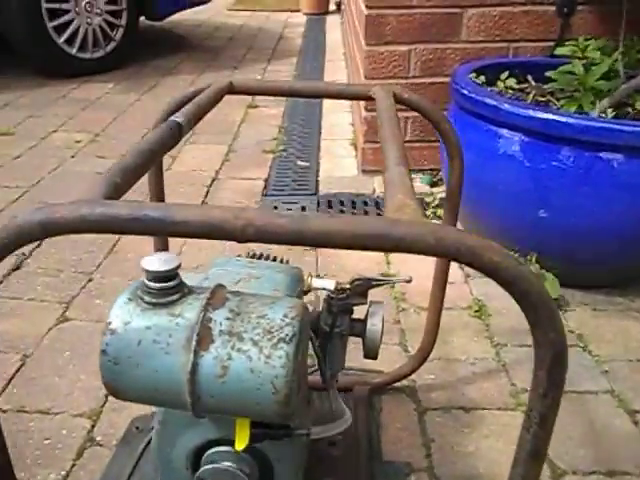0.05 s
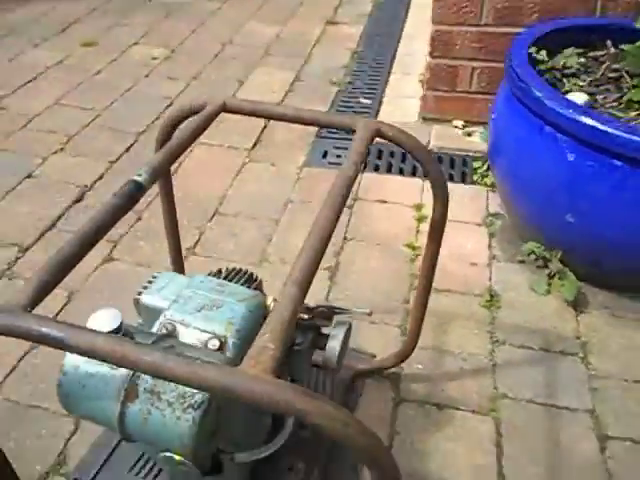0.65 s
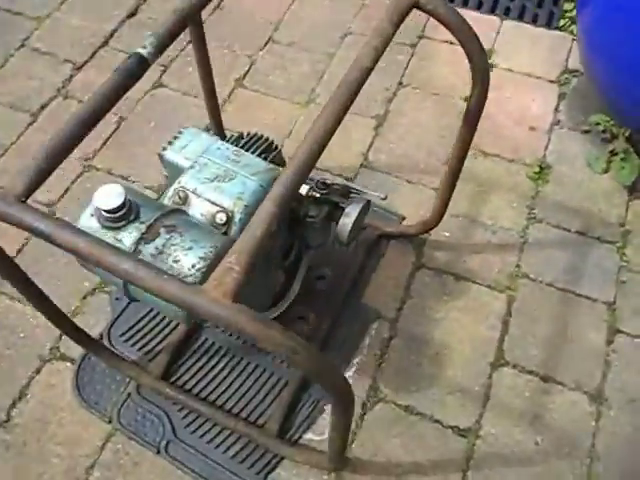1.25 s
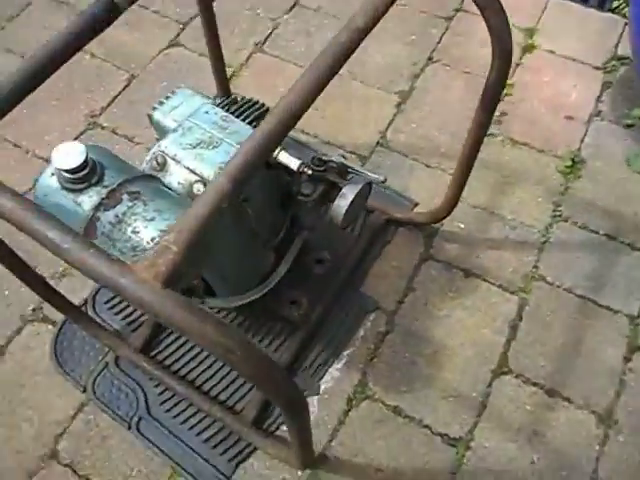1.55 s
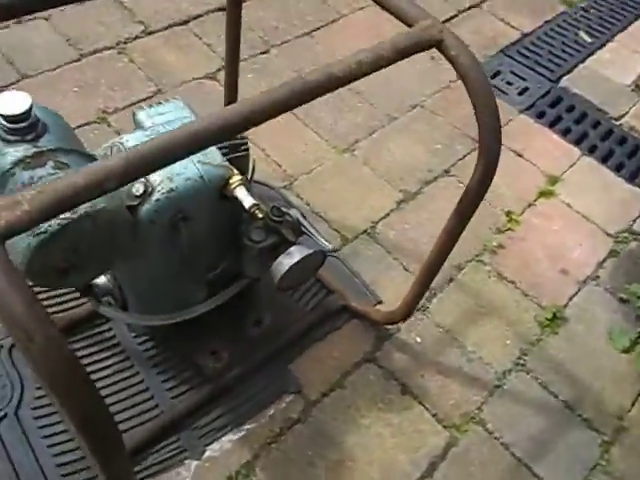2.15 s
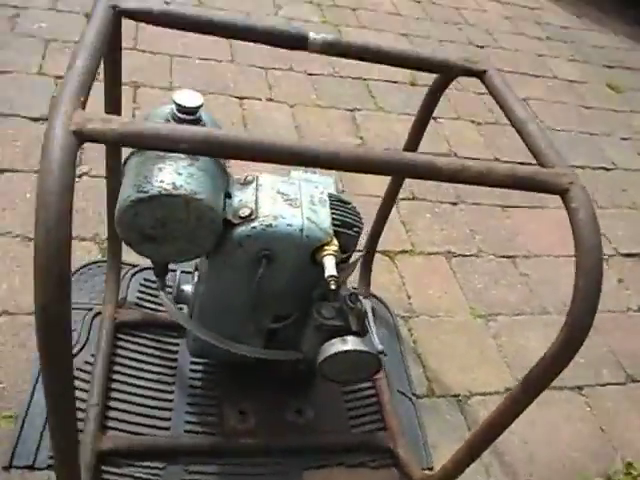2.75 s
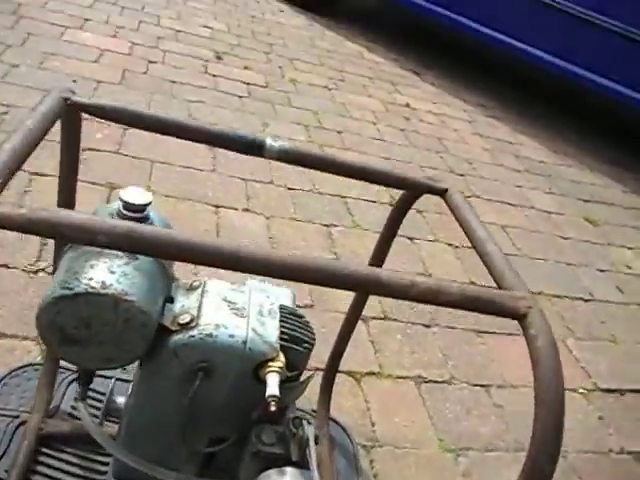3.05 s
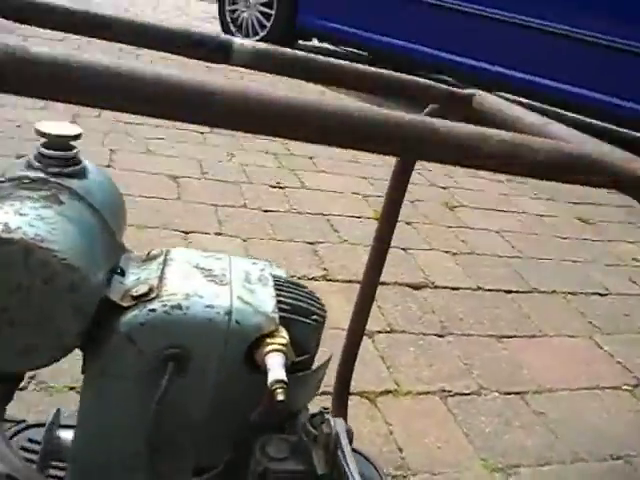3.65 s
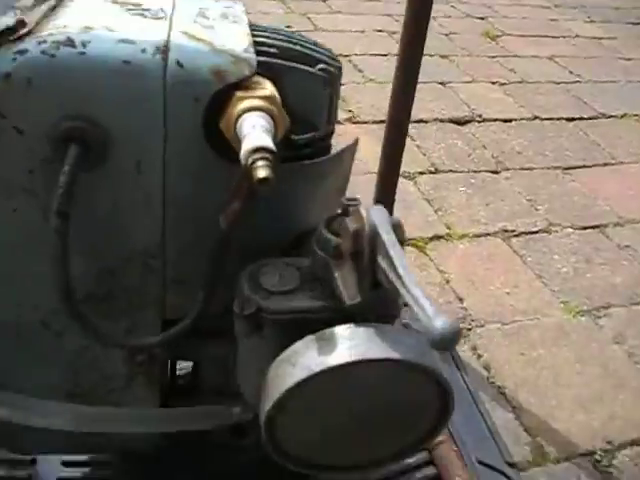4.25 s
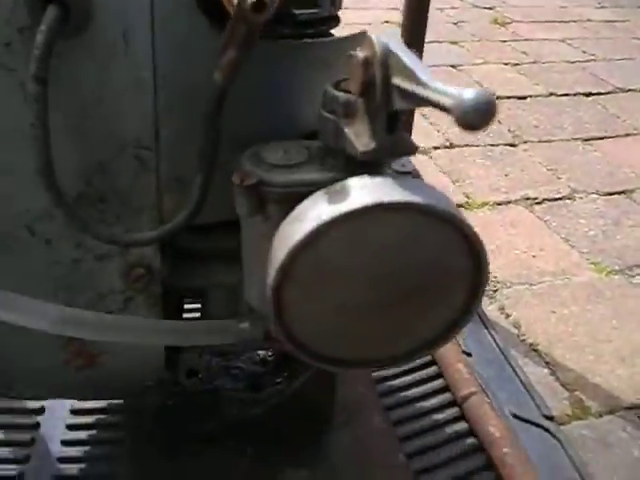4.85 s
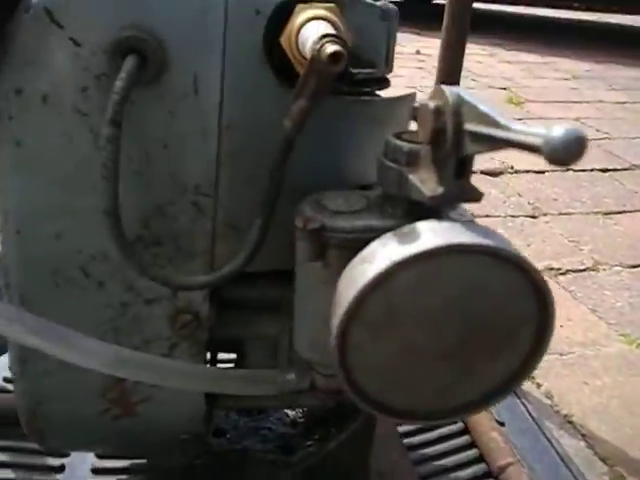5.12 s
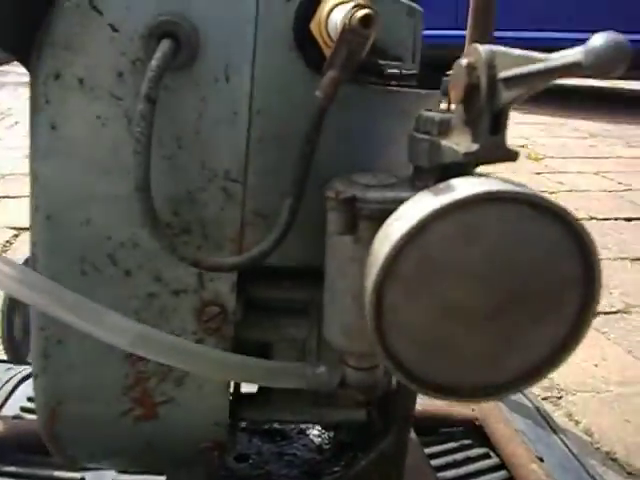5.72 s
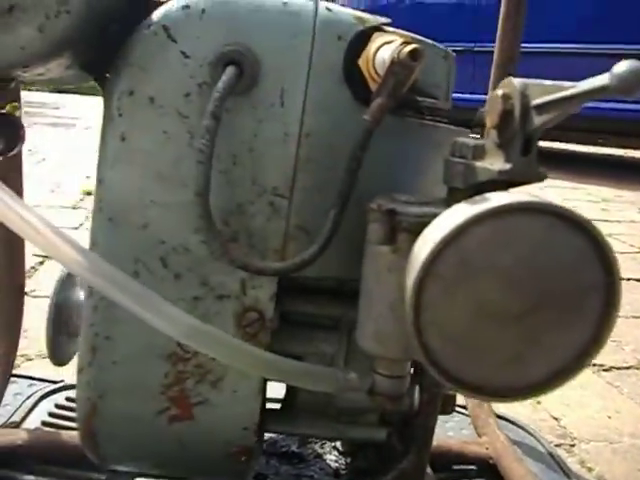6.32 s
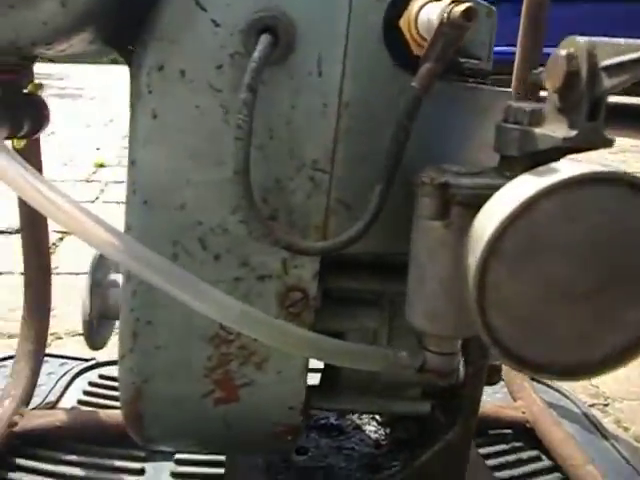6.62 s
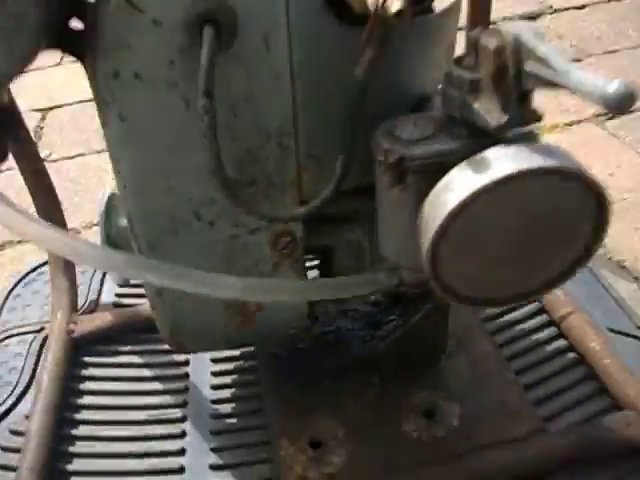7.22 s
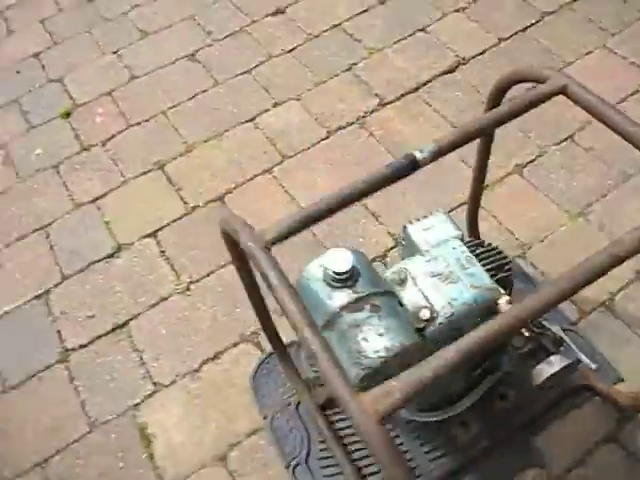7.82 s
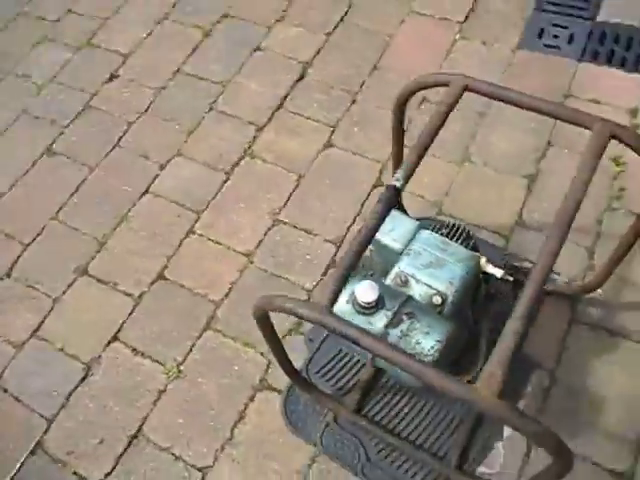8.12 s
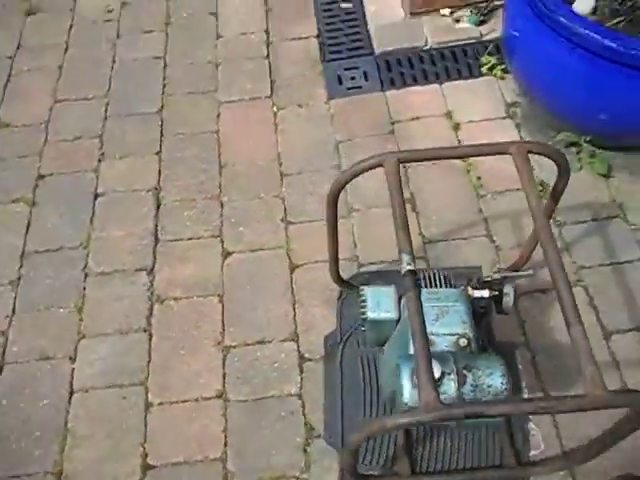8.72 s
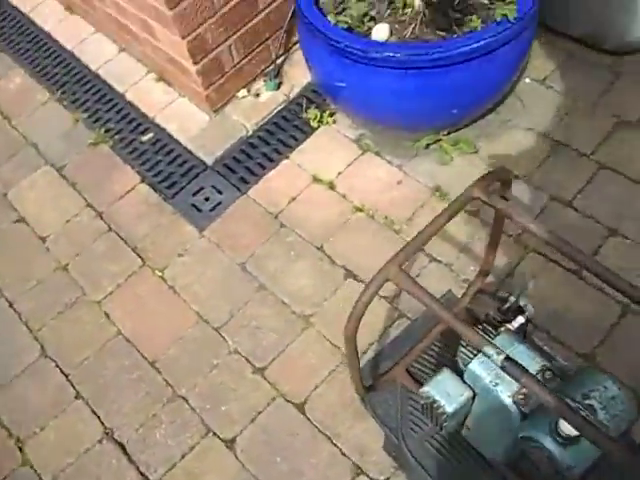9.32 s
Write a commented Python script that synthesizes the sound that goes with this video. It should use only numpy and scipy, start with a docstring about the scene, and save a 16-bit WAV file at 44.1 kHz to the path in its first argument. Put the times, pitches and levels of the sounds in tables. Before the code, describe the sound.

A small two-stroke engine idles outdoors with sharp, uneven exhaust pops, while electrical ticks break into the microphone.

```python
"""Idling two-stroke engine

A small engine idles on a paved driveway while the microphone is carried round it. It turns about
24 times a second and fires every third turn, at times early: a sharp exhaust crack, soft puffs between.
The carburettor hisses once a turn over the rumble of the running gear. The ignition lead puts ticks
into the microphone's amplifier, which duck the gain. Wind buffets the microphone."""
import sys
import numpy as np
from scipy import signal
from scipy.fft import rfft, irfft, next_fast_len
from scipy.io import wavfile

SR = 44100
rng = np.random.default_rng(int(sys.argv[2]) if len(sys.argv) > 2 else 0)


def file_out(sig):
    """Save sig as 16-bit WAV at sys.argv[1]."""
    # one column per channel
    cols = np.atleast_2d(sig).T
    # limit, then scale
    lim = np.clip(cols, -1, 1)
    pcm = np.round(lim * 32767).astype(np.int16)
    wavfile.write(sys.argv[1], SR, pcm)


N = 417627
TIME_S = np.arange(N) / SR

# Hunting idle. Each row: time in seconds, speed in turns per second.
CRANK_SPEED = [(0.0, 22.64), (0.25, 24.72), (0.41, 22.3), (1.66, 24.37), (1.79, 23.25), (3.11, 24.03),
               (3.94, 23.46), (4.06, 24.56), (4.3, 22.01), (4.78, 24.98), (4.93, 22.66), (5.07, 24.74),
               (5.79, 22.57), (5.98, 24.89), (6.64, 23.57), (6.99, 24.14), (7.33, 21.64), (7.65, 23.32),
               (8.03, 23.11), (8.15, 24.58), (8.66, 24.08), (8.78, 24.84), (9.47, 24.37)]
# Early firings that restart the count of three. Each entry: time in seconds.
EARLY_FIRINGS_S = [.09, 1.47, 1.67, 3.27, 3.61, 4.2, 4.29, 4.88, 7.1, 7.19, 9.42]
# Exhaust along the walk. Each row: time in seconds, crack gain in dB, bark and sizzle offsets in dB.
EXHAUST_GAINS = [(0, -13, -2, -8), (.55, -32, 1, 1), (1.4, -21.5, -7, -14.5), (2, -27.5, -2.5, -7.5),
                 (2.7, -17, -2.5, -7), (3.4, -23.5, -6.5, -14), (3.8, -18, -8, -12), (4.7, -17, -1.5, -1.5),
                 (5.6, -21, -1, 1), (6.4, -20, 0.5, -1), (7, -27.5, -1, 3), (7.45, -16, -3, -10),
                 (8.3, -23, 0, -8), (9.47, -19, 0, 1.5)]
# Hard or feeble firings. Each row: time in seconds, crack level in dB re its neighbours.
FIRING_ACCENTS = [(1, 7), (1.59, 6), (1.67, -31), (2.56, 3), (3.19, -2.5), (3.53, -7.5), (3.74, 3.5),
                  (4.55, 4), (4.8, -5), (4.88, 4), (5.51, 2.5), (5.64, -2), (6.39, -0.5), (7.6, -1),
                  (7.72, -6), (8.11, 4.5), (8.48, 3), (8.85, 3.5), (8.97, 4), (9.33, -11.5)]
# Gas path resonances. Each row: frequency in Hz, width in Hz, gain in dB.
SILENCER_MODES = [(246, 220, -5.5), (460, 61, 6.5), (730, 94, 15.5)]
# Silencer shell and cylinder head. Each row: frequency in Hz, width in Hz, gain in dB.
METAL_MODES = [(1887, 47, -0.5), (4490, 59, 0), (4730, 160, 0.5), (5670, 94, 2.5), (6990, 58, 4),
               (9164, 59, 7)]
# Engine along the walk. Each row: time in seconds, then intake, rumble and puff gains in dB.
WALK_GAINS = [(0, -33, -26, -19), (.6, -40.5, -38.5, -24), (1.2, -37.5, -29.5, -18), (2, -39.5, -32.5, -22),
              (2.6, -29, -26, -13), (3.3, -38.5, -39.5, -26), (3.8, -28.5, -31, -13),
              (5.5, -28.5, -31.5, -13.5), (7.1, -32, -31, -13), (7.7, -35, -30.5, -19),
              (8.9, -31, -27.5, -23), (9.47, -36, -29, -22)]
# Intake hiss. Each row: frequency in Hz, relative density in dB.
INTAKE_SPECTRUM = [(1220, -16), (1500, 1.5), (1720, -4), (2000, -1), (2650, 5.5), (3100, -0.5), (5000, 2.5),
                   (5500, 11), (5900, -1), (6600, 0.5), (8000, -13.5), (11000, -14.5)]
# Ignition pick-up. Each row: start in seconds, spark count, first strength re full scale before overload.
SPARK_BURSTS = [(0.024, 2, 1.63), (0.111, 3, 1.63), (0.2356, 7, 1.26), (0.6277, 1, 0.83), (0.719, 4, 0.63),
                (0.9315, 1, 0.68), (1.0188, 4, 0.73), (1.3996, 1, 1.14), (1.6073, 4, 1.22),
                (1.8165, 2, 0.62), (1.947, 1, 0.67), (2.0732, 2, 1.22), (2.2032, 1, 0.88),
                (2.3709, 4, 0.63), (2.7499, 1, 0.61), (2.8365, 1, 1.25), (2.9203, 2, 1.2),
                (3.0853, 6, 1.27), (3.7157, 3, 0.37), (4.0524, 3, 0.55), (4.2223, 1, 2.26),
                (4.311, 1, 0.75), (4.6149, 2, 0.33), (4.7781, 1, 1.12), (4.9038, 1, 1.24),
                (5.1542, 5, 0.85), (5.5299, 2, 1.46), (5.879, 1, 0.27), (5.9198, 2, 1.6), (6.0012, 1, 0.91),
                (6.5364, 1, 1.22), (6.621, 7, 1.1), (7.3933, 1, 0.33), (7.7865, 1, 0.75), (8.9877, 1, 0.59)]
# Crankcase, flywheel fan and frame. Each row: frequency in Hz, relative density in dB.
RUMBLE_SPECTRUM = [(50, 4), (150, 0.5), (310, -4), (435, -8), (530, -12.5), (1200, -24.5), (3000, -32),
                   (11000, -41.5)]
# Cooling fin. Each row: frequency in Hz, width in Hz, gain in dB.
FIN_MODES = [(4450, 16, 8)]
# Flywheel cowl drone. Each row: time in seconds, gain in dB.
COWL_GAINS = [(0, -40), (6.9, -49), (8.2, -40.5), (9.47, -35.5)]
# Wind on the microphone. Each row: time in seconds, gain in dB.
WIND_GAINS = [(0, -37), (7.2, -36.5), (7.7, -24.5), (8.3, -30.5), (9.47, -27)]


def exhaust_cracks(times_s, level_db, bark_db, sizzle_db, rise_s=0.0009, fall_s=0.0023, tail_s=0.015):
    """Burnt gas bursts through the port: a brief jet of noise that rings the metal."""

    def blowdown(t_s):
        age_s = np.maximum(t_s + 0.0007, 0)
        attack = 1 - np.exp(-(age_s / rise_s) ** 2)
        scatter = from_db(-18) * np.exp(-age_s / tail_s)  # off paving, wall and frame
        return attack * (np.exp(-age_s / fall_s) + scatter)

    # The low bark leaves before the jet reaches full speed.
    bark = repeat(times_s - 0.0012, from_db(level_db + bark_db + 10), blowdown) * band_noise(440, 4120)
    crack = repeat(times_s, from_db(level_db + 11.5), blowdown) * band_noise(4100, 7430)
    sizzle = repeat(times_s, from_db(level_db + sizzle_db + 10), blowdown) * band_noise(8860, 10440)
    jet = bark + crack + sizzle
    return jet + metal_ring(jet, times_s)


def metal_ring(jet, times_s, detune=0.012, spread_db=3.0):
    """Gas of changing temperature drives the metal differently at each firing."""
    out, size = np.zeros(N), SR // 12
    for at_s, draws in zip(times_s, rng.standard_normal((len(times_s), len(METAL_MODES), 2))):
        modes = [(hz * (1 + detune * pitch_draw), width_hz, db + spread_db * gain_draw)
                 for (hz, width_hz, db), (pitch_draw, gain_draw) in zip(METAL_MODES, draws)]
        start = round(at_s * SR) - SR // 500
        out[start:start + size] += resonate(jet[start:start + size], modes)
    return out


def exhaust_thumps(times_s, crack_db, follow=0.57, width_s=0.00056):
    """Pressure wave under each crack: down, then up, growing with the crack."""
    return repeat(times_s, from_db(follow * crack_db),
                  lambda t_s: 0.96 * bump(t_s - 0.0019, width_s) - bump(t_s + 0.00046, width_s))


def crank_motion(start_turns=0.918):
    """Crank position in turns per sample, and exhaust port opening times, one a turn."""
    turns = start_turns + np.cumsum(curves(CRANK_SPEED)[0]) / SR
    return turns, np.interp(np.arange(1, int(turns[-1]) + 1), turns, TIME_S)


def firing_mask(openings_s, turns_per_firing=3):
    """Turns that fire, counted from the latest early firing."""
    fired = np.zeros(len(openings_s), bool)
    for at_s in EARLY_FIRINGS_S:
        first = nearest(openings_s, at_s)
        fired[first:] = np.arange(len(openings_s) - first) % turns_per_firing == 0
    return fired


def firing_levels_db(times_s, spread_db=0.9, steadying=0.56):
    """Crack gain, bark and sizzle offsets: microphone position plus charge strength."""
    crack_db, bark_db, sizzle_db = [np.interp(times_s, TIME_S, c) for c in curves(EXHAUST_GAINS)]
    swing_db = spread_db * rng.standard_normal(len(times_s))
    for at_s, accent_db in FIRING_ACCENTS:
        swing_db[nearest(times_s, at_s)] = accent_db
    # Bark and sizzle follow only part of the swing.
    return crack_db + swing_db, bark_db - steadying * swing_db, sizzle_db - steadying * swing_db


def port_puffs(times_s, level_db, width_s=0.00059, muffle_hz=1050, lead_s=0.00068):
    """An unfired turn gulps air at the port: a muffled pressure dip."""
    puff_db = np.interp(times_s, TIME_S, level_db) + rng.standard_normal(len(times_s))
    dips = repeat(times_s - lead_s, -from_db(puff_db), lambda t_s: np.exp(-abs(t_s) / width_s))
    return butterworth(dips, 6, muffle_hz)


def silencer_putter(openings_s, level_db, lag_s=0.0024, width_s=0.0052):
    """Gas rushes through the silencer at each port opening, with a hollow note."""
    gains = from_db(np.interp(openings_s, TIME_S, level_db) - 21)
    return repeat(openings_s + lag_s, gains, lambda t_s: bump(t_s, width_s)) * band_noise(660, 830)


def crankcase_note(turns, level_db, start_hz=230, rise_hz=520, peak_turns=0.32, width_turns=0.074):
    """The descending piston shrinks the crankcase; its note sweeps up once a turn."""
    position = turns % 1
    phase_rad = 2 * np.pi * np.cumsum(start_hz + rise_hz * position) / SR
    return from_db(level_db + 3) * bump(position - peak_turns, width_turns) * np.sin(phase_rad)


def intake_hiss(turns, level_db, peak_turns=0.61, width_turns=0.13, leak_db=-20, spread_db=2.5):
    """Air rasps through the carburettor near top of stroke; a little leaks all turn."""
    gate = bump(turns % 1 - peak_turns, width_turns) + from_db(leak_db)
    breath_db = spread_db * rng.standard_normal(int(turns[-1]) + 1)[turns.astype(int)]
    rasp_db = 3 * band_noise(66, 680)
    return from_db(level_db + 1.5 + breath_db + rasp_db) * gate * coloured_noise(INTAKE_SPECTRUM)


def sparks(openings_s, follow=0.8, ceiling=0.71, spread_db=1.1, near_s=0.015):
    """Time and strength of sparks, one a turn. Bursts open hard and go on weaker; the rest are faint."""
    due_s = (openings_s[1:] + openings_s[:-1]) / 2
    scatter = from_db(spread_db * rng.standard_normal(len(due_s)))
    faint = 0.26 * rng.random(len(due_s)) ** 2
    strong = []
    for start_s, count, strength in SPARK_BURSTS:
        first = nearest(due_s, start_s)
        strong.append((start_s, strength))
        for k in range(first + 1, first + round(count)):
            strong.append((start_s + due_s[k] - due_s[first], min(follow * strength, ceiling) * scatter[k]))
    gap_s = abs(due_s[:, None] - np.array(strong)[:, 0]).min(axis=1)  # to the nearest strong spark
    weak = np.c_[due_s, faint + 0.38 * np.exp(-gap_s / near_s)]
    return [*strong, *weak[gap_s > np.diff(due_s).mean() / 2]]


def ignition_ticks(pickup, overload=0.75, recover_s=0.019, coupling_hz=3.3):
    """Each spark is a leaking step; past overload the amplifier sticks at its rail, then snaps back."""
    out, age_s = np.zeros(N), TIME_S[:SR // 10]
    for at_s, strength in pickup:
        hold_s = 0.01 * max(strength - overload, 0)
        leak = min(strength, overload) * np.exp((hold_s - age_s) / recover_s)
        step = np.where(age_s < hold_s, 1.0, leak)
        start = round(at_s * SR)
        out[start:start + len(step)] += step[:N - start]
    return butterworth(out, 1, coupling_hz, "high")


def gain_control(ticks, threshold=0.067, db_per_unit=170, release_s=0.24):
    """Big ticks duck the gain a few dB; it creeps back between them."""
    pole = np.exp(-1 / (release_s * SR))
    excess = signal.lfilter([1 - pole], [1, -pole], np.maximum(ticks - threshold, 0) + 1e-18)
    return from_db(-db_per_unit * excess)


def gear_rumble(turns, level_db, throb_depth=0.69):
    """The running gear rumbles, throbbing once a turn."""
    throb = 1 + throb_depth * np.cos(2 * np.pi * turns)
    return from_db(level_db + 4) * coloured_noise(RUMBLE_SPECTRUM) * throb


def piston_slap(times_s, level_db):
    """The piston knocks at bottom of stroke and pings a cooling fin."""
    knocks = np.zeros(N)
    knocks[(times_s * SR).astype(int)] = rng.random(len(times_s))
    return resonate(knocks * from_db(level_db + 18), FIN_MODES)


def cowl_drone():
    """Air from the flywheel fan hums in its cowl."""
    return from_db(curves(COWL_GAINS)[0]) * band_noise(385, 465)


def wind(pop_s=8.2122, pop_half_width_s=0.00135):
    """Air buffets the microphone and pops it once."""
    pulse = from_db(-3) * (abs(TIME_S - pop_s) < pop_half_width_s)
    pop = butterworth(pulse, 2, [10, 2700], "band")
    return from_db(curves(WIND_GAINS)[0]) * band_noise(6.5, 120) + pop


def from_db(db):
    """Decibels to gain."""
    return 10 ** (np.asarray(db) / 20)


def curves(rows):
    """Table columns interpolated per sample."""
    times_s, *columns = np.transpose(rows)
    return [np.interp(TIME_S, times_s, column) for column in columns]


def nearest(times_s, at_s):
    """Index of the closest time."""
    return np.argmin(abs(times_s - at_s))


def bump(offset, width):
    """Gaussian of height 1."""
    return np.exp(-0.5 * (offset / width) ** 2)


def repeat(times_s, gains, shape):
    """One scaled copy of shape(seconds from event) at each time."""
    clicks, half = np.zeros(N), SR // 10
    inside = (times_s >= 0) & (times_s < TIME_S[-1])
    clicks[(times_s[inside] * SR).astype(int)] = gains[inside]
    return signal.fftconvolve(clicks, shape(np.arange(-half, half + 1) / SR), "same")


def butterworth(x, order, edges_hz, kind="low"):
    """Causal filter with a flat passband."""
    return signal.sosfilt(signal.butter(order, edges_hz, kind, fs=SR, output="sos"), x)


def band_noise(low_hz, high_hz):
    """Noise in one band, rms 1."""
    x = butterworth(rng.standard_normal(N), 2, [low_hz, high_hz], "band")
    return x / x.std()


def coloured_noise(spectrum):
    """Noise of a given spectrum, rms 1."""
    hz, db = np.transpose(spectrum)
    size = next_fast_len(N)
    bins_hz = np.maximum(np.fft.rfftfreq(size, 1 / SR), 1)
    gains = from_db(np.interp(np.log(bins_hz), np.log(hz), db))
    x = irfft(rfft(rng.standard_normal(size)) * gains, size)[:N]
    return x / x.std()


def resonate(x, modes):
    """Parallel two-pole resonators, each peaking at its gain in dB."""
    out = 0
    for hz, width_hz, db in modes:
        radius = np.exp(-np.pi * width_hz / SR)
        scale = (1 - radius ** 2) / 2
        feedback = [1, -2 * radius * np.cos(2 * np.pi * hz / SR), radius ** 2]
        out = out + from_db(db) * signal.lfilter([scale, 0, -scale], feedback, x + 1e-18)
    return out


def scene():
    """Exhaust, intake, running gear and ignition follow the crank; ticks duck everything else."""
    intake_db, rumble_db, puff_db = curves(WALK_GAINS)
    turns, openings_s = crank_motion()
    fired = firing_mask(openings_s)
    firings_s = openings_s[fired]
    crack_db, bark_db, sizzle_db = firing_levels_db(firings_s)
    puffs = port_puffs(openings_s[~fired], puff_db)
    thumps = exhaust_thumps(firings_s, crack_db)
    firing = thumps + 0.5 * resonate(thumps, SILENCER_MODES)
    firing += exhaust_cracks(firings_s, crack_db, bark_db, sizzle_db)
    pumping = puffs + resonate(puffs, SILENCER_MODES) + silencer_putter(openings_s, puff_db)
    pumping += crankcase_note(turns, rumble_db) + intake_hiss(turns, intake_db)
    gear = gear_rumble(turns, rumble_db) + piston_slap(openings_s, puff_db) + cowl_drone()
    ticks = ignition_ticks(sparks(openings_s))
    return (ticks + gain_control(ticks) * (firing + pumping + gear + wind()))[None]


def record(dry, microphone_hz=10700, rail=0.72, soften_hz=13000, stopband_hz=16900):
    """Small microphone with little top; the loudest peaks flatten at the rail."""
    x = butterworth(dry, 12, microphone_hz)
    x = x / (1 + (x / rail) ** 12) ** (1 / 12)
    x = butterworth(x, 1, soften_hz)
    return signal.sosfilt(signal.cheby2(12, 70, stopband_hz, fs=SR, output="sos"), x)


dry = scene()
out = record(dry)
file_out(out)
```